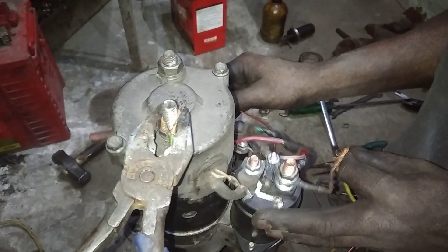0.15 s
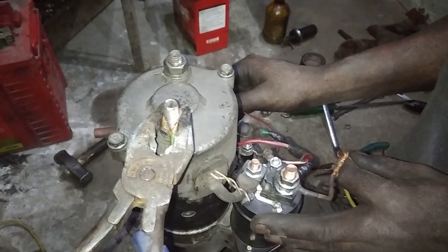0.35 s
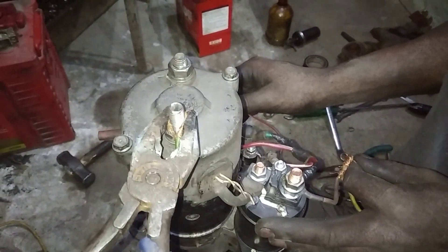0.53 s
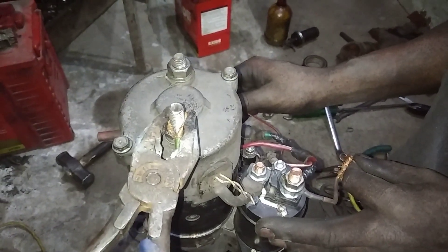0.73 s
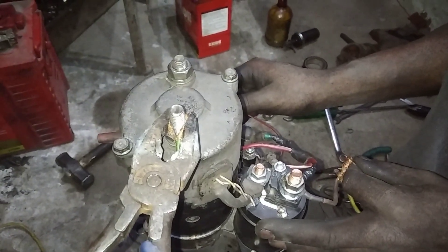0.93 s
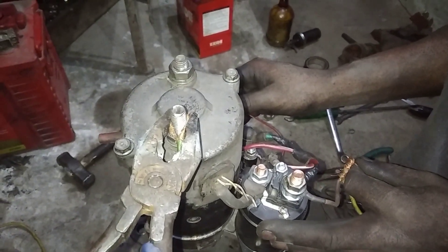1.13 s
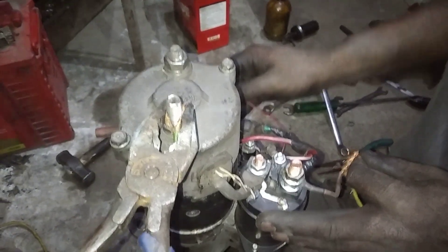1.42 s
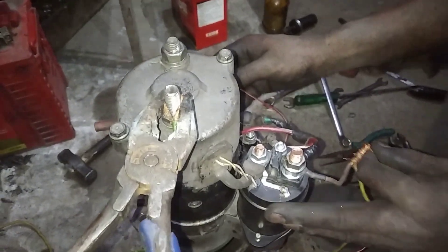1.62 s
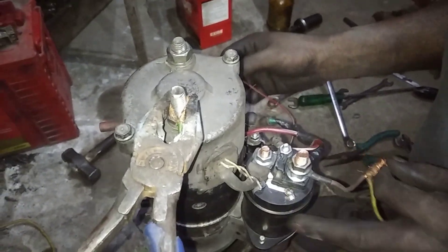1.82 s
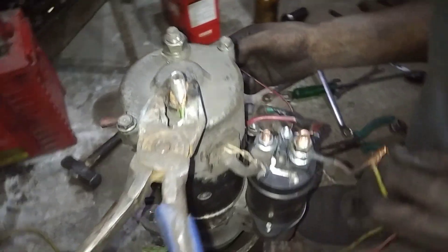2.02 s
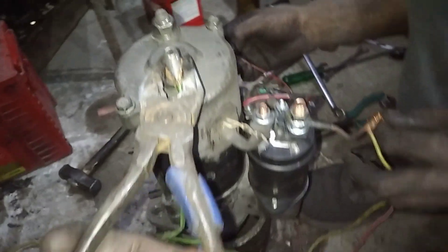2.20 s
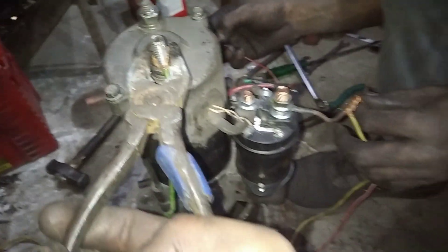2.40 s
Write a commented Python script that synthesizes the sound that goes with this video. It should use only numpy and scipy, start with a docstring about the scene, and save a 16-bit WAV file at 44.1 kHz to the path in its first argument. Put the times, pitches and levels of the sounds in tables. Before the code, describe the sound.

A starter motor clunks, hammers and whirs loudly under power, then coasts down with a falling whine

```python
"""A falling whine and soft hiss come first: a starter motor on a workshop floor, still coasting.
A wire touches its solenoid: a click, a clunk, then nearly half a second of hammering under power,
before the rotor coasts down. Brushes crossing commutator bars make harmonics that flare at casing resonances.
Brush rub and knocks are filtered noise, blows are decaying noise bursts, and room echo is decaying noise.
A phone with two microphone ports listens close by."""
import sys
import numpy as np
from scipy import signal
from scipy.fft import rfft, irfft, next_fast_len
from scipy.io import wavfile
from scipy.ndimage import uniform_filter1d

SR = 44100
rng = np.random.default_rng(int(sys.argv[2]) if len(sys.argv) > 2 else 0)


def log_audio(samples):
    """Write samples as a 16-bit WAV file to the path given in sys.argv[1]."""
    # one column per channel
    frames = np.atleast_2d(samples).T
    # limit to full scale, then quantise
    limited = np.clip(frames, -1, 1)
    pcm = np.round(limited * 32767).astype(np.int16)
    wavfile.write(sys.argv[1], SR, pcm)


N = 112454
T = np.arange(N) / SR
PADDED_N = next_fast_len(N + SR // 2)  # half a second of room for filter tails
F = np.maximum(np.fft.rfftfreq(PADDED_N, 1 / SR), 1)
SIDES = np.array([[1], [-1]])  # left, right


def undb(db):
    """Decibel law: 20 dB is a factor of ten in amplitude."""
    return 10 ** (np.asarray(db) / 20)


def curve(table):
    """Linear interpolation of a table's second column over time."""
    points = np.array(table)
    return np.interp(T, points[:, 0], points[:, 1])


def colour(table):
    """Spectral envelope: decibels interpolated over log frequency."""
    points = np.array(table)
    return undb(np.interp(np.log(F), np.log(points[:, 0]), points[:, 1]))


def mode(hz, width_hz):
    """Simple resonance: a damped oscillator's response, with gain 1 at its centre."""
    return 1 / (1 + 1j * (F - hz ** 2 / F) / width_hz)


def through(x, response):
    """Linear filtering: multiplying spectra convolves sound with response."""
    return irfft(rfft(x, PADDED_N) * response, PADDED_N)[..., :N]


def unit(x):
    """Normalisation to an RMS of 1."""
    return x / np.sqrt(np.mean(x ** 2))


def noise():
    """White noise: equal power at all frequencies."""
    return rng.standard_normal(N)


def walk(rate):
    """Slow random modulation: stepped levels, smoothed twice, with a spread near 1."""
    hold = max(int(SR / rate), 1)
    steps = np.repeat(rng.standard_normal(N // hold + 1), hold)
    return 1.3 * uniform_filter1d(uniform_filter1d(steps, hold), hold)[:N]


def pair(draw, wide):
    """Mid-side stereo: a shared sound plus another of opposite sign on the two sides."""
    return draw() + wide * draw() * SIDES


# spectrum of the workshop air: pitch_hz, relative level_db
SHOP_COLOUR = [(12, -46.5), (20, -22), (48, -6.5), (150, -11.5), (274, -28), (503, -30), (1180, -33.5),
               (1510, -33.5), (1740, -28.5), (14500, -67.5)]
# faint high hiss at the end: start_s, pitch_hz, width_hz (of one resonance pass), level_db
LAST_HISS = (2.49, 10300, 2000, -76)
SHOP_DB, SHOP_LUMPY_DB = -57.5, 0.5


def shop():
    """Broadband ambience: lumpy, mostly low noise, joined at the end by a band of high hiss."""
    air = pair(lambda: noise() * undb(SHOP_LUMPY_DB * walk(25.28)), 0.14)
    start_s, hz, width_hz, db = LAST_HISS
    band = through(rng.standard_normal((2, N)), mode(hz, width_hz) ** 2)
    hiss = unit(band) * np.clip((T - start_s) / 0.022, 0, 1)
    return undb(SHOP_DB) * unit(through(air, colour(SHOP_COLOUR))) + undb(db) * hiss


# dull thuds of the motor on the floor: start_s, level_db, length_s
THUDS = [(.212, -42, .035), (.712, -29, .024), (.793, -39, .035)]
# low hums as the rotor comes to rest: start_s, length_s, pitch_hz, level_db
HUMS = [(2.03, .07, 288, -56), (2.13, .18, 225, -54)]
THUD_HZ, THUD_WIDTH_HZ = 213, 290
HUM_WANDER_DB = 2.


def bump(start_s, length_s):
    """Amplitude envelope: the square root of half a sine."""
    return np.sin(np.pi * np.clip((T - start_s) / length_s, 0, 1)) ** .5


def settling():
    """Resonant filtering and amplitude modulation: floor thuds are low noise, the last hums wavering sines."""
    low = unit(through(noise(), mode(THUD_HZ, THUD_WIDTH_HZ) ** 2))
    out = sum(undb(db) * low * bump(start_s, length_s) for start_s, db, length_s in THUDS)
    for start_s, length_s, hz, db in HUMS:
        level = undb(db + HUM_WANDER_DB * walk(41.8)) * bump(start_s, length_s)
        out = out + level * np.sin(2 * np.pi * hz * T)
    return out


# resonances of the frame and floor, shaken by the rattle here and by the blows below:
# pitch_hz, width_hz (of one resonance pass), rattle level_db, relative blow level_db
FRAME = [(60, 60, -42.5, -17.5), (128, 53, -37, -20.5), (169, 31, -39.5, -5), (294, 70, -34, -5.5),
         (580, 970, -38.5, 3.5), (1374, 93, -35, -13.5), (1636, 410, -38, -2.5), (2086, 353, -33.5, 6.5),
         (2797, 490, -32.5, -2.5), (4460, 890, -36.5, 6), (7560, 9000, -26.5, -0.5),
         (10370, 15000, -47, 6.5)]
POWER_ON_S, POWER_OFF_S = .25, 0.701
POWER_RISE_S, POWER_FALL_S = 0.0033, 0.028  # linear rise, exponential fall
RATTLE_PER_S, RATTLE_WIDE, RATTLE_SPREAD_DB = 2500, 0.99, 3.


def rattle():
    """Random impulse excitation: while current flows, dense knocks shake the frame; low modes roar smoothly."""
    rise = np.clip((T - POWER_ON_S) / POWER_RISE_S, 0, 1)
    on = rise * np.exp(-np.maximum(T - POWER_OFF_S, 0) / POWER_FALL_S)
    out = 0
    for hz, width_hz, db, _ in FRAME:
        spread_db = RATTLE_SPREAD_DB * min(hz / 1000, 1)
        wide = RATTLE_WIDE * min(hz / 2000, 1)  # low modes differ less between sides

        def knocks():
            """Poisson-like impulses: random instants and strengths."""
            hits = rng.random(N) < RATTLE_PER_S / SR
            return hits * noise() * undb(spread_db * walk(60))

        out = out + undb(db) * on * unit(through(pair(knocks, wide), mode(hz, width_hz) ** 2))
    return out


# solenoid blows: start_s, relative level_db, added treble_db
BLOWS = [(0.2104, -21.5, 6.5), (0.2409, -1.5, 1.5), (0.2536, 4, -11), (0.2595, -8.5, -5.5),
         (0.2757, -12, 10.5), (0.2977, -6.5, -0.5), (0.3132, -10, 1.5), (0.3511, -4.5, -3.5),
         (0.388, -6.5, 3), (0.428, -5.5, -12.5), (0.4656, -5.5, 0), (0.5054, -6.5, -18.5),
         (0.5432, -7, 1.5), (0.5804, -9, 1.5), (0.6175, -13.5, 6), (0.6584, -4.5, -2.5), (0.694, -5, 2)]
BLOW_RISE_S, BLOW_T60_S, BLOW_DB = 0.00091, 0.017, -7.5  # T60: time to fall by 60 dB
BASS_BELOW_HZ, TREBLE_ABOVE_HZ = 800, 3500
CLUNK_FROM_S, CLUNK_TO_S = .25, .265
CLUNK_BASS_DB, HAMMER_BASS_DB = -0.5, -15.5  # only the clunk booms in the floor
STRIKE_AFTER_S = .0017  # the plunger lands just after the contacts start to chatter
STRIKE_DB = 13  # one-sample strike, relative to the chatter


def blows():
    """Impact excitation: each plunger blow is a short chatter with a hard strike in it; both ring the frame."""
    out, crack = 0, rng.standard_normal((2, N))
    for hz, width_hz, _, db in FRAME:
        bass = hz < BASS_BELOW_HZ
        push, strike = 0, np.zeros(N)
        for start_s, peak_db, treble_db in BLOWS:
            bass_db = CLUNK_BASS_DB if CLUNK_FROM_S < start_s < CLUNK_TO_S else HAMMER_BASS_DB
            own_db = peak_db + bass_db * bass + treble_db * (hz > TREBLE_ABOVE_HZ)
            since = np.maximum(T - start_s, 0)
            push = push + undb(own_db - 60 * since / BLOW_T60_S) * (1 - np.exp(-since / BLOW_RISE_S))
            strike[int((start_s + STRIKE_AFTER_S) * SR)] = -undb(own_db + STRIKE_DB)
        # a one-way push drives the bass; the rest gets two-sided noise
        force = np.abs(crack[0]) if bass else crack[0] + RATTLE_WIDE * crack[1] * SIDES
        level = undb(db + BLOW_DB) * np.sqrt(3000 / width_hz)  # narrow modes get more gain
        out = out + level * through(push * force + strike, mode(hz, width_hz) ** (2 if bass else 1))
    return out


# broad response of the casing: pitch_hz, gain_db
CASING_BODY = [(400, -30), (800, -15), (1500, -12), (1850, -20), (2200, -10), (2800, -16), (3900, -16),
               (4200, -5), (7400, -4), (7900, -9), (9200, -8), (10500, -10), (12200, -6), (12500, -18),
               (14500, -22)]
# resonances of the casing: pitch_hz, width_hz, gain_db, left-minus-right pan_db
CASING = [(1520, 150, -10, 0), (2290, 450, -5, 6), (4400, 350, -3, 8), (5700, 250, -6, 2),
          (5950, 300, -2, -8), (6400, 300, -5, 0), (7220, 400, -7, 0), (8200, 300, 2, -8),
          (8550, 600, 9, 0), (9900, 250, -4, 0), (11000, 400, -2, 8), (11900, 500, -6, -2)]


def casing():
    """Modal summation: the casing's broad response plus its resonance peaks, seen from each side."""
    response = colour(CASING_BODY)
    for hz, width_hz, db, pan_db in CASING:
        response = response + undb(db + SIDES / 2 * pan_db) * np.abs(mode(hz, width_hz)) ** 2
    return response


# rate at which commutator bars pass a brush: time_s, rate_hz
BAR_RATE = [(0, 1487), (.24, 1000), (.33, 1900), (.46, 2700), (.52, 2880), (.6, 3140), (.68, 3320),
            (.725, 3350), (.784, 3214), (.908, 2939), (1.052, 2603), (1.184, 2316), (1.326, 1992),
            (1.494, 1643), (1.786, 1071), (2.042, 575), (2.2, 280), (2.36, 5), (2.55, 1)]
# whine partials: multiple of the bar rate, level_db before the casing at full speed, slope_db per decade of speed
WHINE = [(.58, -42, 45), (1, -38, 18), (2, -28, 52), (3, -33, 28), (4, -35, 29), (5, -41, 26), (6, -44, 25),
         (7, -47, 25), (8, -50, 25)]
# brush hiss over time: time_s, level_db
HISS = [(0, -37.5), (.205, -43.5), (.212, -32), (.24, -34.5), (.3, -36), (.4, -28.5), (.5, -28),
        (.74, -30.5), (1.17, -32), (1.45, -37.5), (1.82, -42.5), (2.0, -46.5), (2.11, -55.5), (2.28, -65.5),
        (2.34, -84), (2.55, -88.5)]
# spectrum of brush hiss before casing ring is added: pitch_hz, relative level_db
HISS_COLOUR = [(240, -32.5), (500, -31.5), (1500, -10), (1800, -8), (2400, -0.5), (2900, -13.5),
               (3200, -21.5), (3900, -25), (4400, 3.5), (6000, -1.5), (8400, -1.5), (11400, -6),
               (12600, -8), (14500, -19.5)]
# rumble of the turning rotor in the floor: pitch_hz, width_hz (of one resonance pass), level_db at full speed
RUMBLE = [(170, 70, -57), (289.8, 80, -56.5), (710, 680, -55.5), (3000, 5400, -53.5)]
FULL_SPEED_HZ = 3000  # bar rate at which the levels above are stated
RUMBLE_SLOPE_DB = 9  # per decade of speed
FLUTTER_DB, LOADED_DB = 2.2, -4
HISS_GRAIN_DB, HISS_WIDE, HISS_RING_DB = 2.5, 1, -13


def rotor_whine(hz, speed_decades):
    """Harmonic synthesis: brushes snapping over bars make partials of the bar rate, which ring the casing."""
    phase = 2 * np.pi * np.cumsum(hz) / SR
    whine = 0
    for multiple, db, slope_db in WHINE:
        level = undb(db + slope_db * speed_decades + FLUTTER_DB * walk(25))
        tone = np.sin(multiple * phase + 2 * np.pi * rng.random())
        whine = whine + level * tone * (multiple * hz < .45 * SR)  # no aliasing
    # brushes under current sing less clearly
    power_times = [POWER_ON_S - .01, POWER_ON_S, POWER_OFF_S - .02, POWER_OFF_S]
    powered = np.interp(T, power_times, [0, 1, 1, 0])
    return through(whine * undb(LOADED_DB * powered), casing())


def brush_hiss():
    """Friction noise: brushes rubbing on the bars give grainy noise, partly rung by the casing."""
    rub = pair(lambda: noise() * undb(HISS_GRAIN_DB * walk(300)), HISS_WIDE)
    response = colour(HISS_COLOUR) + undb(HISS_RING_DB) * casing()
    return unit(through(rub, response)) * undb(curve(HISS))


def rotor_rumble(speed_decades):
    """Structure-borne noise: floor resonances rumble, louder with the speed of the rotor."""
    rumble = 0
    for hz, width_hz, db in RUMBLE:
        shaking = pair(noise, min(hz / 1500, 1))
        rumble = rumble + undb(db) * unit(through(shaking, mode(hz, width_hz) ** 2))
    return rumble * undb(RUMBLE_SLOPE_DB * speed_decades)


def rotor():
    """Superposition: whine, brush hiss and floor rumble of one rotor add."""
    hz = curve(BAR_RATE)
    speed_decades = np.log10(hz / FULL_SPEED_HZ)
    return rotor_whine(hz, speed_decades) + brush_hiss() + rotor_rumble(speed_decades)


ROOM_T60_S, ROOM_DB = 0.39, -12
LEFT_LAG = 7  # samples by which the left side is late


def room(motor):
    """Reverberation: convolution with exponentially decaying noise echoes the motor off walls and floor."""
    echo = rng.standard_normal((2, N)) * undb(-60 * T / ROOM_T60_S)
    echo = echo * (T > .003) * (T < .5)
    response = rfft(unit(echo) / np.sqrt(N), PADDED_N)
    return undb(ROOM_DB) * through(motor.mean(axis=0), response)


def scene():
    """Superposition: motor, its echo and the workshop add, with a small arrival delay on the left."""
    motor = rotor() + rattle() + blows() + settling()
    left, right = motor + room(motor) + shop()
    return np.array([np.roll(left, LEFT_LAG), right])


# difference between the microphone ports: pitch_hz, left-minus-right level_db
BALANCE = [(60, -1), (300, 0.5), (600, 1), (1200, -1.5), (2200, 7), (4500, 0), (9000, 0)]
LOW_CUT_HZ, TOP_HZ = 36, 14200


def record(dry):
    """Filtering and saturation: two differing ports; the phone thins bass, rounds loud peaks and cuts the top."""
    ports = through(dry, colour(BALANCE) ** (SIDES / 2))
    thin = signal.sosfilt(signal.butter(2, LOW_CUT_HZ, "high", fs=SR, output="sos"), ports)
    rounded = np.tanh(thin)
    return signal.sosfilt(signal.ellip(10, .2, 80, TOP_HZ, fs=SR, output="sos"), rounded)


dry = scene()
out = record(dry)
log_audio(out)
```